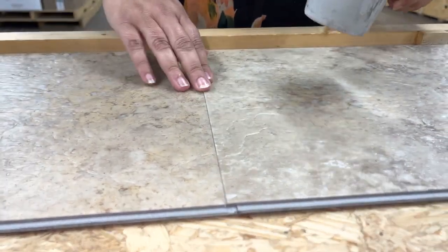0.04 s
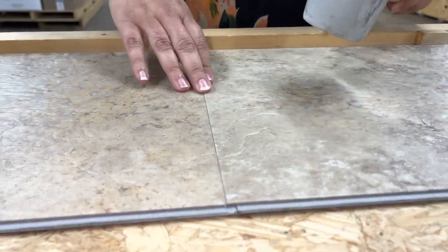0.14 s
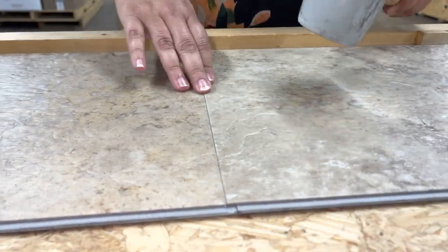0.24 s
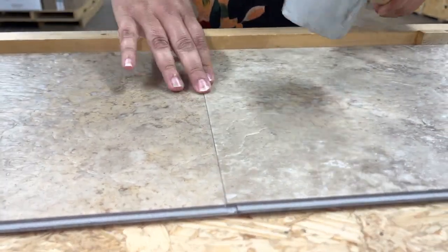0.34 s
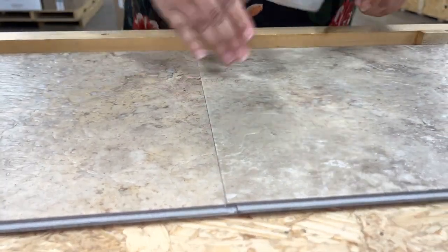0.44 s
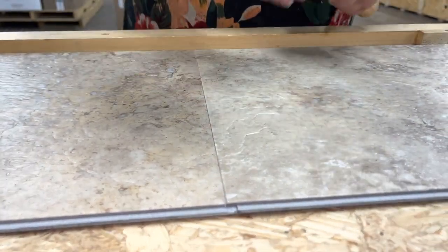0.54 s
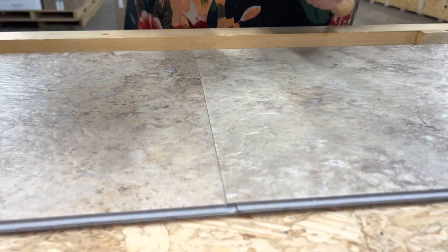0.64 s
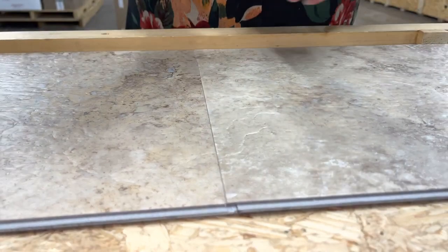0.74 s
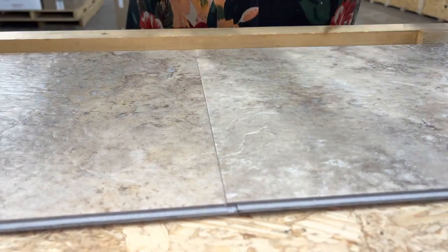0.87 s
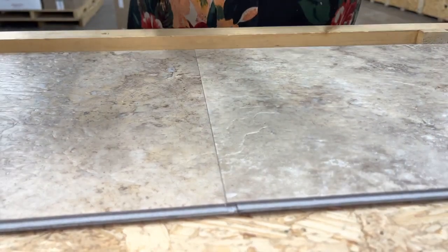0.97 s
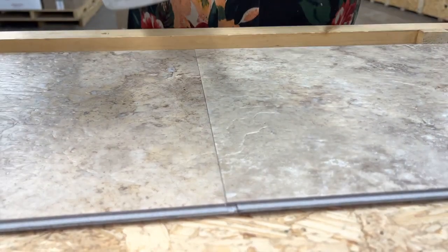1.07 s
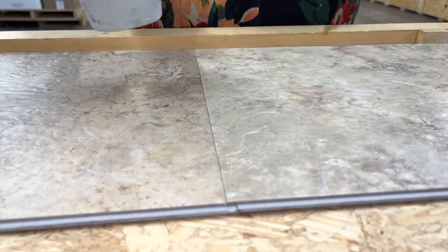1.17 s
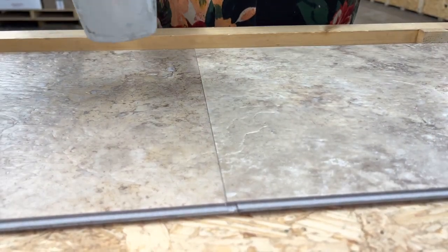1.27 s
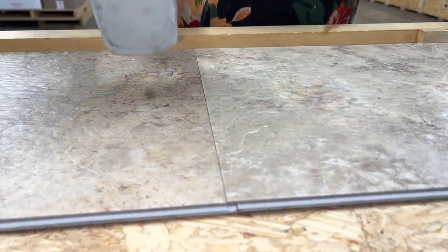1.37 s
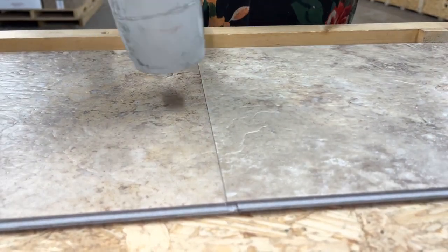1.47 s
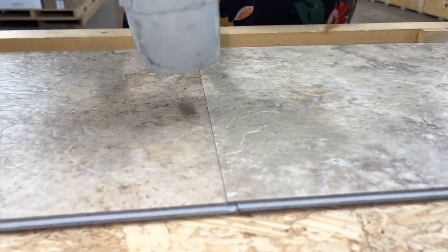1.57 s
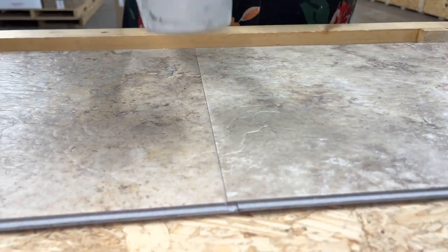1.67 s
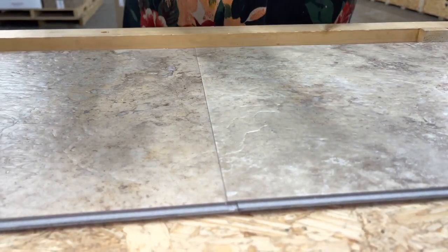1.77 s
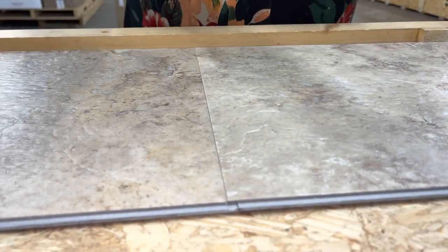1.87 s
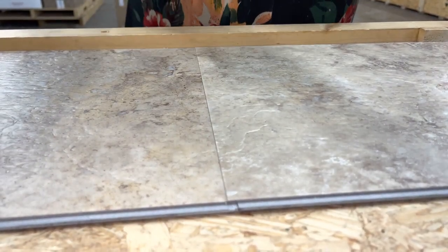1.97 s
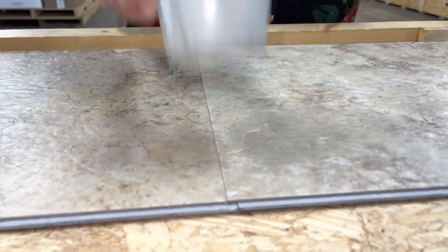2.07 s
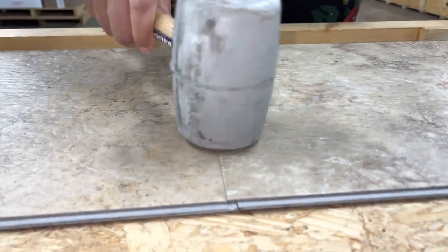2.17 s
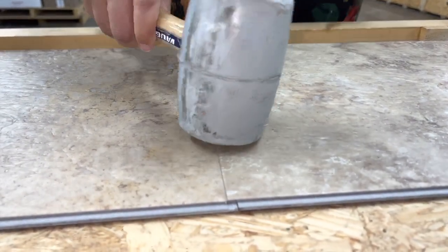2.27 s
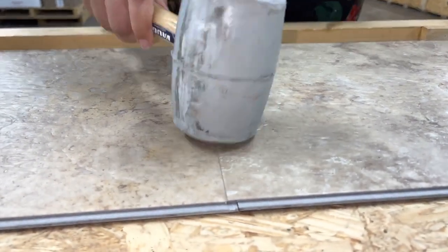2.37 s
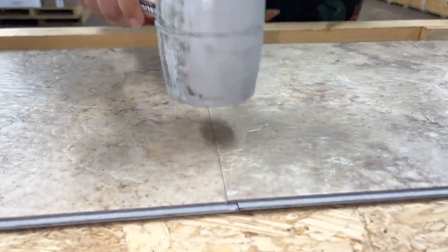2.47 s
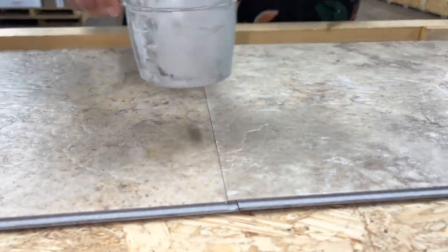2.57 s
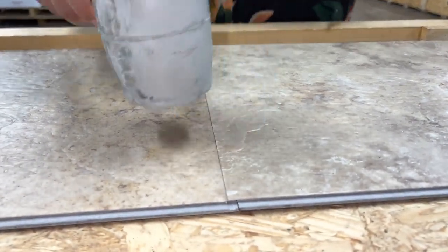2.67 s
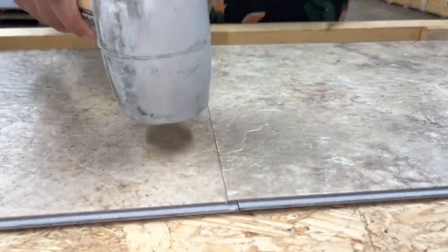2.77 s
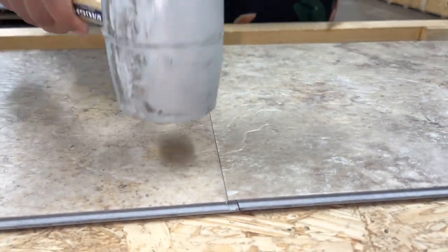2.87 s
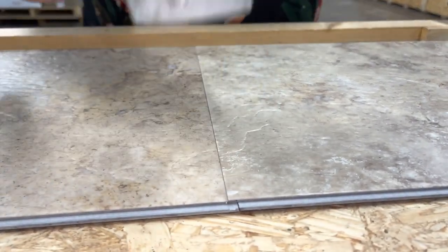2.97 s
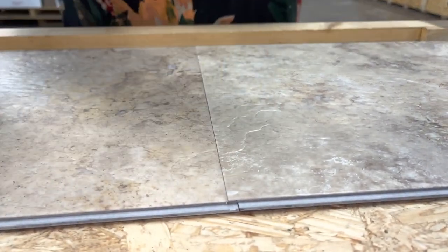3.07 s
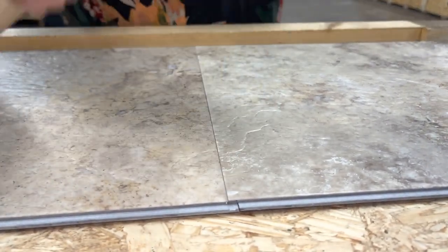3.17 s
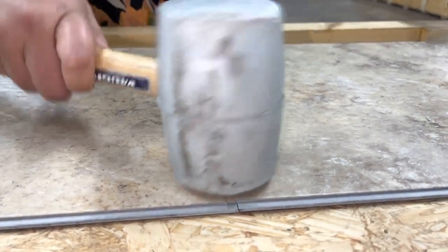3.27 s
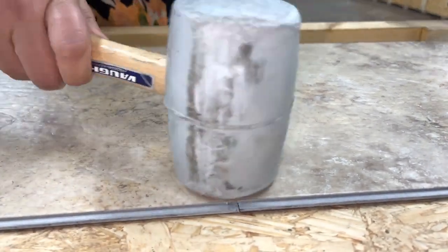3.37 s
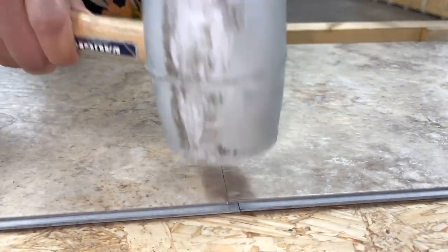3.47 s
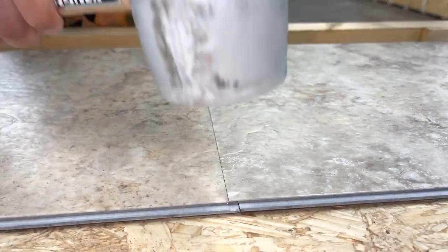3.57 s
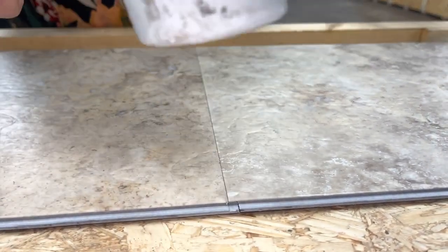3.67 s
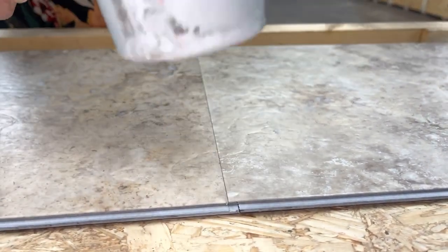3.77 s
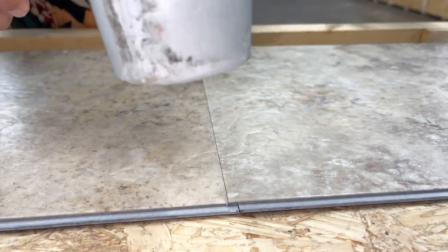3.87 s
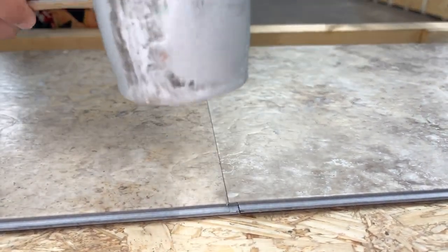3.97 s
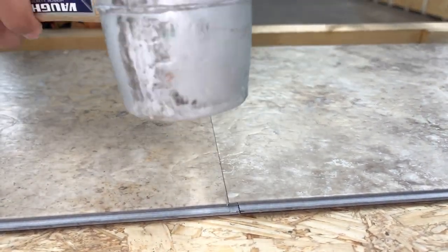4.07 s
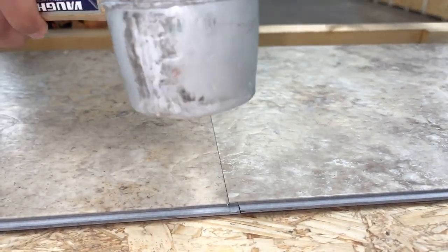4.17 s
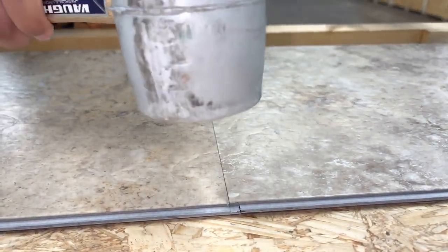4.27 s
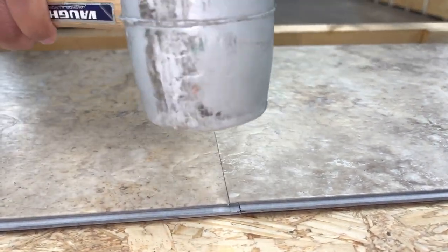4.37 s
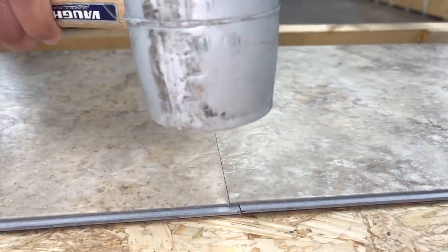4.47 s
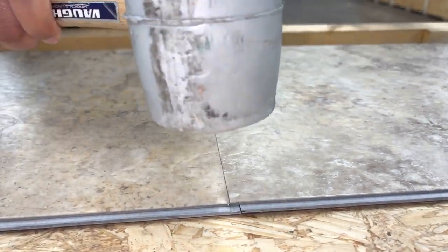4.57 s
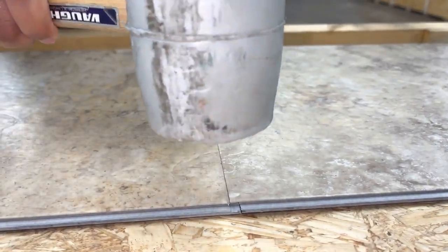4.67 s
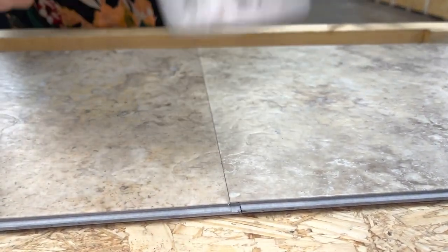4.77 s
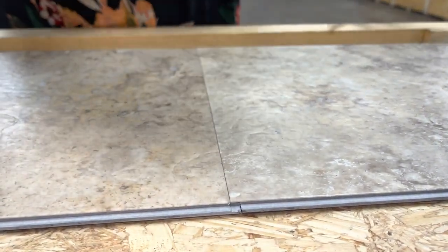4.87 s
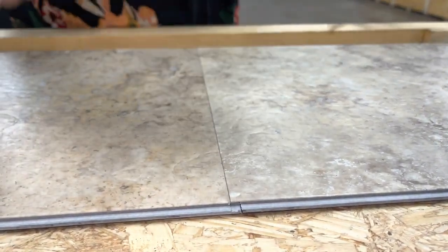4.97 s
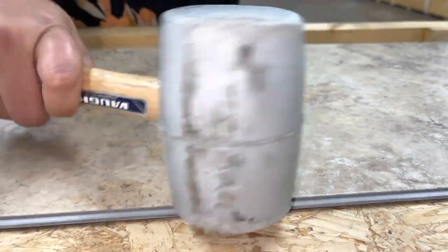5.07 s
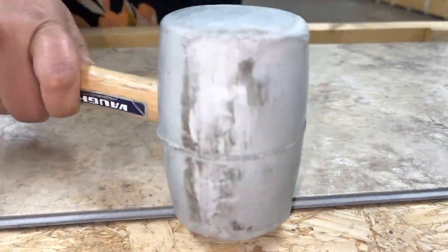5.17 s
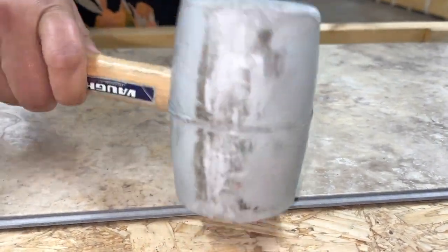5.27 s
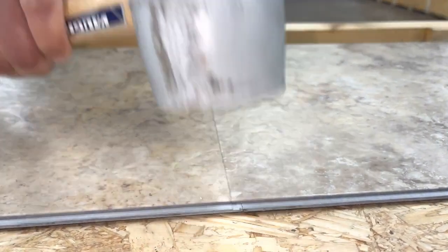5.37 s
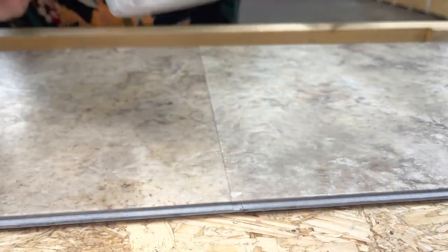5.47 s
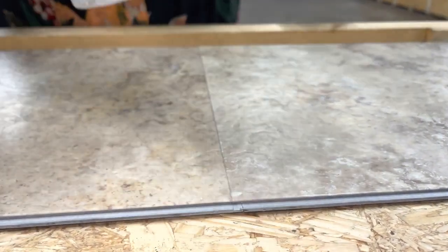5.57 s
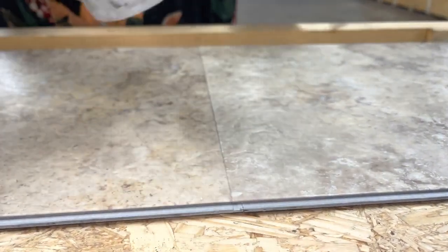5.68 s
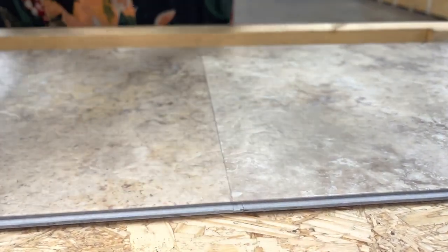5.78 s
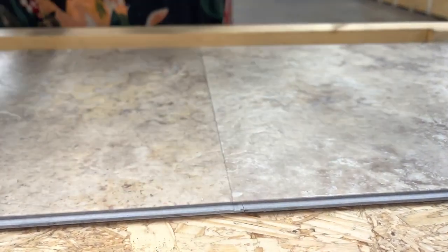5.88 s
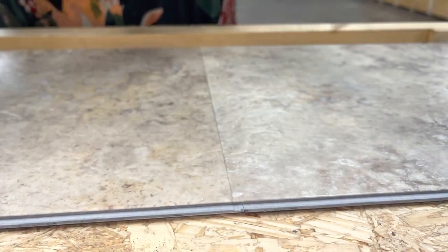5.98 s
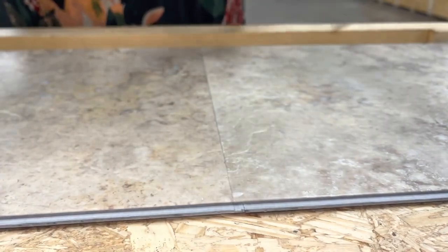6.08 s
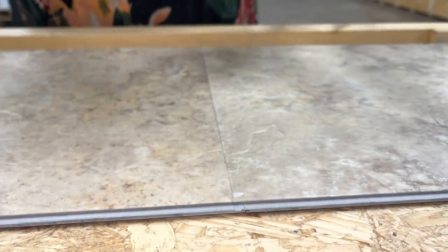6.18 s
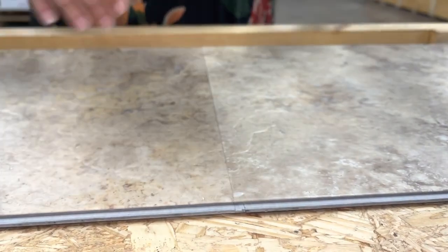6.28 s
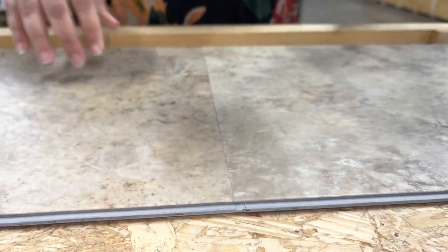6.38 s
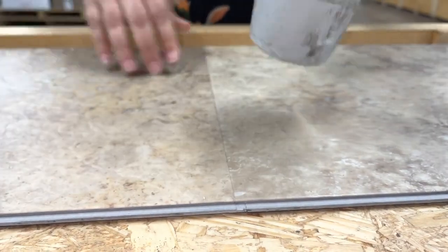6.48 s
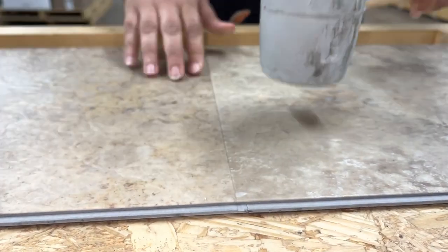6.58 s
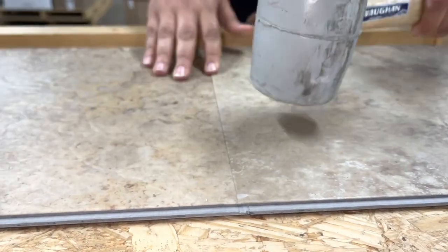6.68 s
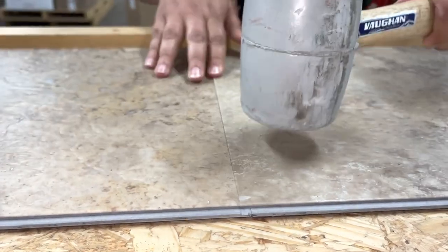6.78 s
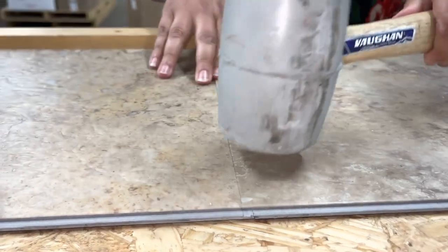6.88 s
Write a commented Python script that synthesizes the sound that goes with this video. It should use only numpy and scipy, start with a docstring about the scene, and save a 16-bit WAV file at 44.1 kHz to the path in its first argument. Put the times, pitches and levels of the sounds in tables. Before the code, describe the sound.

Close to a chipboard bench in a large indoor showroom, fans hum low while a sleeve rustles and small things tick. A rubber mallet then strikes a floor tile three times, about a second and then nearly two seconds apart, each a hard crack with a deep thud, woody rattle and hall tail. The background ducks at the knocks and stays quieter after the second.

```python
"""A large showroom, heard close to a chipboard bench: a rubber mallet knocks three times on a floor tile laid on it.
A noise burst swells just before each blow, which is a crack and a falling sine thud, ringing sines and rattling noise.
Noise bands and long sines make the hall's tail and the bench frame; fans are wavering noise, hum, drone and whine.
A sleeve rustles in strokes of treble noise and small things tick. The level of hall and fans dips at every knock,
swells back and settles, staying low after the second."""
import sys
import numpy as np
from scipy import signal
from scipy.fft import rfft, irfft
from scipy.io import wavfile
from scipy.ndimage import uniform_filter1d

SR = 44100
rng = np.random.default_rng(int(sys.argv[2]) if len(sys.argv) > 2 else 0)


def digitize_waveform(pressure):
    """Quantize a signal to 16-bit integers and store it at the path in sys.argv[1].

    Rows of a 2-D input are taken as channels; values are limited to [-1, 1].
    """
    field = np.atleast_2d(pressure).T
    bounded = np.clip(field, -1, 1)
    quanta = np.round(bounded * 32767).astype(np.int16)
    wavfile.write(sys.argv[1], SR, quanta)


N = 305613

# Colours below list relative levels: noise() brings each colour to rms 1 before its own level is set.

# Level of far sound, shared by hall and fans
START_DB, FALL_S, DIP_S = -0.07, .015, 0.074  # first level, fall before the blow, lowest point after it
CLIMB_AFTER_S, CLIMB_DB_PER_S = 1.2, 6.5  # a long while after a knock it creeps up again
LEFT_LAG = 18  # samples by which far sound reaches the left side late

# Fans
# colour of moving air: (frequency [Hz], relative density [dB per Hz])
AIR_COLOUR = [(20, -9.5), (35, -11.5), (70, -0.5), (120, -4.5), (250, -17.5), (500, -25), (800, -32),
              (1150, -32.5), (1500, -31), (1900, -37), (2250, -39.5), (2800, -43), (5000, -53), (6300, -50),
              (7100, -59), (9000, -59), (13000, -64.5)]
AIR_DB = -45.5
MURMUR_HZ, MURMUR_DB = 1600, 1.5  # the air wavers most around here
# likeness of left and right noise: (frequency [Hz], likeness [-1 to 1])
ALIKE = [(60, 0.95), (200, .92), (400, .7), (700, .4), (1400, 0.15), (3000, .08)]
MAINS_HZ, DRONE_HZ = 59.2, 134.6
MAINS_DB = -45
# a motor drone that wavers, sinks and partly returns: (time [s], level [dB])
DRONE_LEVEL = [(0, -45), (.4, -38.5), (.62, -38.5), (.68, -46), (.75, -39), (2.1, -37), (2.6, -40.5),
               (2.9, -54), (3.1, -42), (4, -46.5), (6.93, -46.5)]
# whine, lowest line first: (level [dB]) for each of six evenly spaced lines
WHINE_LEVELS = (-90, -79.5, -81.5, -78, -76.5, -85.5)
WHINE_HZ, WHINE_STEP_HZ = 3796.3, 79.65  # lowest line and spacing
WHINE_HISS_DB = -81

# Sleeve and ticks
# strokes of sleeve and hand: (time [s], hold [s], level [dB], rise over 20 dB [s], fall over 20 dB [s],
# brightness [dB per octave])
RUSTLE_STROKES = [(.004, .02, -87, .01, .25, 1.3), (0.322, .004, -67, 0.022, 0.048, 2),
                  (0.372, .046, -57.5, .012, 0.021, 3.5), (0.558, .004, -71, 0.22, 0.086, 19),
                  (0.655, .004, -64.5, 0.16, .09, -1), (.694, .004, -63, 0.022, 0.1, 3),
                  (0.795, 0.022, -65.5, 0.033, 0.11, 1), (1.111, 0.057, -68, .04, .1, -9),
                  (1.235, .01, -62.5, 0.081, .065, 0), (1.317, .004, -62.5, 0.029, .016, -2),
                  (1.617, 0.0046, -76, 0.028, 0.036, 1.3), (2.04, .03, -76.5, .2, .03, 0.55),
                  (2.571, .02, -65, 0.068, 0.079, -7.5), (2.657, 0.0037, -65.5, 0.015, 0.03, 0.5),
                  (5.981, .05, -87, .05, .1, 2.5), (6.309, 0.039, -84.5, .04, .03, 3.5),
                  (6.66, 0.2, -78, .17, .16, -2.5)]
# colour of rubbing cloth, also of the spit in a tick: (frequency [Hz], relative density [dB per Hz])
CLOTH_COLOUR = [(800, -22), (2000, 8.5), (3500, 3), (6000, 5.5), (9000, 4.5), (11500, 9), (13000, -39.5)]
# small taps: (time [s], body level [dB], body pitch [Hz], treble level [dB], left minus right [dB])
TICKS = [(.049, -56.5, 655, -65, 5.5), (0.314, -62, 1540, -60, 4), (.325, -56.5, 960, -68, 5),
         (.651, -54.5, 630, -57, 11), (1.914, -66, 1460, -55.5, 4), (2.649, -81, 1490, -58, 3),
         (5.869, -83, 1660, -94, -4), (5.949, -76, 670, -82, 2), (6.03, -85, 3650, -67.5, 4),
         (6.342, -73, 970, -67, 3), (6.448, -74, 955, -65, 4), (6.466, -72.5, 1130, -70, -4),
         (6.479, -78, 890, -76, 6), (6.758, -76, 568, -83, 8), (6.771, -72, 520, -68, 11)]
TICK_ROUGH_T60_S, TICK_RING_T60_S, TICK_SPIT_T60_S = 0.036, 0.033, 0.013
TICK_RING_DB = 5.5  # against the body level

# The three knocks, one entry a knock under each name. Times in [s], frequencies in [Hz], levels in [dB]:
# s (time of the thud); run_up_s, run_up_bend (burst before it: length; under 1 swells early, over 1 late),
# left_db, right_db, top_hz, treble_db (rough levels, upper corner and sizzle of that burst);
# wave_db, wave_s (thud level and length); crack_db, crack_tilt_db (tilt [dB per octave]);
# lift_hz, lift_db (a lift or cut high in the crack), snap_db (and one around SNAP_HZ);
# bounce_s, bounce_db (a faint second tick); ring_db (bench and clatter together),
# clatter_rise_s, clatter_db (against ring_db), clatter_tilt_db ([dB per octave]), drop_db (later step);
# hall_db, hall_tilt_db ([dB per octave] above 1 kHz); far sound: blow_db (at the thud), dip_db,
# swell_s, swell_db (when and how high it swells back), rest_db, settle_s (where it rests, how soon)
KNOCKS = dict( s=(2.0989, 3.233, 5.0365), run_up_s=(.0135, .015, .024), run_up_bend=(.8, 0.83, 1.5),
          wave_db=(-0.5, -9.5, -5), wave_s=(.014, .016, .019), crack_db=(-9, -10, -18),
          crack_tilt_db=(2.5, 1.13, -8.5), lift_hz=(13800, 11300, 11420), lift_db=(13.5, -4, 16.5),
          snap_db=(7.5, 2, -2), bounce_s=(.026, .025, .032), bounce_db=(-42.5, -50, -36.5),
          ring_db=(-16, -27, -18.5), clatter_rise_s=(.011, .004, .005), clatter_db=(1.34, 2.5, 2),
          clatter_tilt_db=(-0.4, 0.8, .7), drop_db=(-3, -2.5, 0), left_db=(-16.5, -13, -24.5),
          right_db=(-7, -6, -18), top_hz=(2200, 1600, 1150), treble_db=(-26.5, -16, -43),
          hall_db=(-20.5, -16.5, -15.5), hall_tilt_db=(-0.3, 1.43, -2), blow_db=(-9, -28.5, -12),
          dip_db=(-15.5, -29, -20), swell_s=(.35, 0.2702, .24), swell_db=(4.5, -16, -10.5),
          rest_db=(-3, -25, -24), settle_s=(0.09, 0.115, 0.19))
EACH_KNOCK = [dict(zip(KNOCKS, row)) for row in zip(*KNOCKS.values())]
BLOW_SIZE, BLOW_LEAD_S = 32768, .05  # samples worked out around one blow; they begin this long before it
BLOW_T = np.arange(BLOW_SIZE) / SR - BLOW_LEAD_S
BLOW_BINS_HZ = np.fft.rfftfreq(BLOW_SIZE, 1 / SR)

# Run-up: the burst before each blow
# resonances: (frequency [Hz], width [Hz], lift [dB])
RUN_UP_PEAKS = [(320, 60, 9), (654, 30, 11), (980, 270, 5), (1220, 90, 4), (1740, 240, 5.5), (2750, 180, 8)]
# colour of its treble: (frequency [Hz], relative density [dB per Hz])
SIZZLE_COLOUR = [(2000, -19), (3000, -5), (4400, -5.5), (5200, -7.5), (6000, -2.5), (7600, -9.5),
                 (8800, -11), (11000, -28.5), (13000, -60.5)]
SIZZLE_BEND = 1.4  # the treble swells late
LEFT_TILT_DB = -3  # an octave: the rough part is duller on the left

# Thud, crack and first echo
WAVE_TURNS, WAVE_START_S, WAVE_END_HZ, WAVE_PHASE = 1.25, .001, 50, .39  # phase in turns
# colour of the crack: (frequency [Hz], relative density [dB per Hz])
CRACK_COLOUR = [(1000, -24), (2500, -3.5), (5500, -4.5), (8500, -5.5), (10000, -12), (11500, -12.5),
                (13000, -27.5), (14500, -46.5), (16500, -59.5)]
SNAP_HZ = 5400
ECHO_S, ECHO_DB = .0115, -17.5

# Bench, clatter and frame
# modes of the board: (frequency [Hz], relative level [dB], t60 [s])
BENCH_MODES = [(36.72, -5, 0.34), (157, -2.5, 0.21), (368, -7.5, 0.076), (527, -5.5, 0.13),
               (661, -12, 0.13), (1061, -6.5, 0.056), (1243, -18, 0.11), (1428, -16, 0.1),
               (1765, -14, 0.14), (2060, -20.5, 0.067), (2850, -30.5, .2)]
RING_RISE_S = .011
# colour of the rattle: (frequency [Hz], relative density [dB per Hz])
CLATTER_COLOUR = [(60, -11.5), (150, 1.5), (400, -6), (1000, -15.5), (1700, -19.5), (3000, -37),
                  (6000, -47.5), (11000, -49), (13500, -87.5)]
# likeness of left and right rattle: (frequency [Hz], likeness [-1 to 1])
CLATTER_ALIKE = [(200, .82), (700, .02), (1400, 0.077)]
CLATTER_T60_S = 0.26
DROP_S = .061  # bench and clatter start to step down this long after the blow
# long modes of the bench frame: (frequency [Hz], relative level [dB], t60 [s])
FRAME_MODES = [(91.7, -13.5, 7.5), (102, -14, 16), (165, -9.5, 1.8)]
FRAME_DB = -9.5  # against the hall
BEAT_HZ, BEAT_LAG_S = (198.3, 201.4), .065  # close modes throb about three times a second
BEAT_DB, BEAT_T60_S = -9.5, 2.93

# Hall
# colour of the tail: (frequency [Hz], relative density [dB per Hz])
HALL_COLOUR = [(35, -38.5), (60, -17.5), (95, -8), (200, -6), (250, -19.5), (600, -23), (850, -28),
               (1200, -24), (1700, -22.5), (2300, -30.5), (3200, -38), (5000, -42.5), (6500, -39.5),
               (9000, -44), (11500, -52.5), (13500, -78.5)]
# decay of the tail: (frequency [Hz], t60 [s])
HALL_T60 = [(100, 1.2), (300, 1.4), (1000, .75), (2000, .9), (4000, 1.1), (10000, 0.66)]
HALL_RISE_S = 0.013  # the tail builds up

# Final colour
# tone of the whole mix: (frequency [Hz], gain [dB])
FINAL_COLOUR = [(15, -20.5), (28, -7), (45, 0.5), (9000, 0), (10100, -8), (11300, 2.5), (13000, -3.5)]
HISS_DB, TOP_HZ = -102, 16400


def undb(db):
    """Decibels to gain."""
    return 10 ** (np.asarray(db) / 20)


def read(table, x):
    """Second column of a table at x, on a log axis."""
    return np.interp(np.log(x + 1), np.log(np.array(table)[:, 0] + 1.), np.array(table)[:, 1])


def curve(table):
    """A (time [s], level [dB]) table as a gain for every sample."""
    return undb(np.interp(np.arange(N) / SR, *np.transpose(table)))


def noise(colour, size=N, alike=ALIKE):
    """Spectra of left and right noise of a given colour and likeness, rms 1."""
    hz = np.fft.rfftfreq(size, 1 / SR)
    mid, side = rfft(rng.standard_normal((2, size))) * undb(read(colour, hz))
    likeness = np.clip(read(alike, hz), -1, 1)
    pair = np.sqrt(1 + likeness) * mid + np.sqrt(1 - likeness) * side * np.array([[1], [-1]])
    return pair / np.std(irfft(pair, size))


def tilt(colour, tilt_db):
    """A colour made brighter or duller, turning about 4 kHz."""
    return [(hz, db + tilt_db * np.log2(hz / 2 ** 12)) for hz, db in colour]


def octaves(pair):
    """Splits noise into overlapping octave bands that add up to the whole from 16 Hz to 16 kHz."""
    at = np.log2(np.fft.rfftfreq(N, 1 / SR) + 1)
    for centre in range(4, 15):
        weight = np.cos(np.pi / 2 * np.clip(at - centre, -1, 1)) ** 2
        yield 2. ** centre, irfft(pair * weight, N)


def walk(rate):
    """Random levels held 1 / rate s and slewed twice."""
    hold = int(SR / rate)
    steps = np.repeat(rng.standard_normal(N // hold + 1), hold)
    return uniform_filter1d(uniform_filter1d(steps, hold), hold)[:N]


def fade(t, t60):
    """Silence before t = 0, then 60 dB down in t60."""
    return (t >= 0) * np.exp(-np.log(1000) * np.abs(t) / t60)


def ring(t, modes, scatter_db):
    """Modes of a struck body as dying sines; every blow shares its force out anew."""
    return sum(undb(db + scatter_db * rng.standard_normal()) * fade(t, t60) * np.sin(2 * np.pi * hz * t)
               for hz, db, t60 in modes)


def add(out, x, s):
    """Mixes x into out from time s on."""
    i = int(round(s * SR))
    out[:, i:i + x.shape[-1]] += x[..., :N - i]


def far_level():
    """Gain of far sound: at each knock it falls, dips, swells back, settles and, if left alone, creeps up."""
    db = np.full(N, START_DB)
    for k in EACH_KNOCK:
        t = np.arange(N) / SR - k["s"]
        before = db[np.searchsorted(t, -FALL_S)]
        dip = np.interp(t, [-FALL_S, 0, DIP_S, k["swell_s"]],
                        [before, k["blow_db"], k["dip_db"], k["swell_db"]])
        settled = 1 - np.exp(-np.clip(t - k["swell_s"], 0, None) / k["settle_s"])
        settle = (k["rest_db"] - k["swell_db"]) * settled
        climb = CLIMB_DB_PER_S * np.clip(t - CLIMB_AFTER_S, 0, None)
        db = np.where(t < -FALL_S, db, dip + settle + climb)
    return undb(db)


def fans():
    """Moving air in bands that swell together and flicker alone, mains hum, a motor drone and a thin whine."""
    t, swell = np.arange(N) / SR, walk(0.56)
    air = 0
    for hz, band in octaves(noise(AIR_COLOUR)):
        flicker_db = 1.26 + MURMUR_DB / (1 + np.log2(hz / MURMUR_HZ) ** 2)
        air = air + band * undb(swell + flicker_db * walk(6.3))
    # slow random phase keeps each tone from standing still
    mains = undb(MAINS_DB + 0.47 * walk(5.4)) * np.sin(2 * np.pi * MAINS_HZ * t + .5 * walk(2.4))
    drone = curve(DRONE_LEVEL) * undb(1.2 * walk(2.8)) * np.sin(2 * np.pi * DRONE_HZ * t + .4 * walk(12))
    whine = 0
    for line, db in enumerate(WHINE_LEVELS):
        hz = WHINE_HZ + line * WHINE_STEP_HZ
        whine = whine + undb(db + 1.1 * walk(10)) * np.sin(2 * np.pi * hz * t + walk(18))
    # a narrow hiss around the whine
    hiss = irfft(noise([(3500, -38), (3850, -3), (4100, 1.5), (4300, -2.5), (4700, -43.5)]), N)
    return (undb(AIR_DB) * air * undb([[.8], [-.8]])
            + mains * undb([[1.2], [-1.2]])
            + drone * undb([[2.5], [-3.0]])
            + whine * undb([[1.5], [-1.5]])
            + undb(WHINE_HISS_DB) * hiss)


def rustle():
    """Cloth rubbing: strokes of grainy treble noise that rise, hold and fall."""
    out, size = np.zeros((2, N)), 32768
    for s, hold_s, db, rise_s, fall_s, tilt_db in RUSTLE_STROKES:
        lead = min(s, .3)  # room for the rise
        t = np.arange(size) / SR - lead
        shape_db = db - 20 * np.maximum(np.maximum(-t / rise_s, (t - hold_s) / fall_s), 0)
        cloth = irfft(noise(tilt(CLOTH_COLOUR, tilt_db), size), size)
        add(out, undb(shape_db) * cloth, s - lead)
    return out * undb(1.5 * walk(160))


def ticks():
    """Small taps: a short ring with a rough edge and a spit of treble."""
    out, size = np.zeros((2, N)), 2048
    t = np.arange(size) / SR
    for s, body_db, hz, treble_db, pan_db in TICKS:
        peak = [(hz / 1.5, -25), (hz / 1.1, -3), (hz * 1.1, -3), (hz * 1.4, -14), (hz * 2.5, -22), (hz * 5, -50)]
        edge = irfft(noise(peak, size, alike=[(1, .8), (2, 0.67)]), size)
        rough = undb(body_db) * edge * fade(t, TICK_ROUGH_T60_S)
        tone = undb(body_db + TICK_RING_DB) * np.sin(2 * np.pi * hz * t) * fade(t, TICK_RING_T60_S)
        spit = undb(treble_db) * irfft(noise(CLOTH_COLOUR, size), size) * fade(t, TICK_SPIT_T60_S)
        attack = np.clip(t / 0.00063, 0, 1)
        add(out, attack * (rough + tone + spit) * undb([[pan_db / 2], [-pan_db / 2]]), s)
    return out


def run_up(k):
    """A rough, resonant burst with sizzling treble swells just ahead of the thud and stops as the thud begins."""
    swell = np.clip(1 + BLOW_T / k["run_up_s"], 0, 1) * (BLOW_T < 0)
    peaks_db = sum(db / (1 + ((BLOW_BINS_HZ - hz) / width) ** 2) for hz, width, db in RUN_UP_PEAKS)
    duller = undb(np.array([[LEFT_TILT_DB], [0]]) * np.log2((BLOW_BINS_HZ + 1) / 2 ** 10))
    top_hz = k["top_hz"]
    colour = [(150, -14), (330, -.8), (700, 0), (top_hz, -4), (1.4 * top_hz, -20), (3 * top_hz, -45)]
    spectrum = noise(colour, BLOW_SIZE, alike=[(1, -.5), (2, -.5)]) * undb(peaks_db - 5.0) * duller
    rough = irfft(spectrum, BLOW_SIZE) * undb([[k["left_db"]], [k["right_db"]]])
    sizzle = undb(k["treble_db"]) * irfft(noise(SIZZLE_COLOUR, BLOW_SIZE), BLOW_SIZE)
    return swell ** k["run_up_bend"] * rough + swell ** SIZZLE_BEND * sizzle


def bending_wave(k):
    """Bending waves disperse: the high pitches arrive first, so the sine thud glides down."""
    after = np.clip(BLOW_T, 0, None)
    turns = WAVE_TURNS * np.log(1 + after / WAVE_START_S) + WAVE_END_HZ * after + WAVE_PHASE
    turns = turns + np.array([[0], [.05]])  # the right side runs slightly ahead
    shape = np.clip(BLOW_T / 0.0019, 0, 1) * np.exp(-(after / k["wave_s"]) ** 3)
    return undb(k["wave_db"]) * shape * np.sin(2 * np.pi * turns) * undb([[0], [-2.5]])


def crack(k):
    """The hard contact: a few milliseconds of bright noise, then a faint second tick as it bounces."""
    lift_db = k["lift_db"] / (1 + ((BLOW_BINS_HZ - k["lift_hz"]) / 1600) ** 2)
    snap_db = k["snap_db"] / (1 + ((BLOW_BINS_HZ - SNAP_HZ) / 700) ** 2)
    spectrum = noise(tilt(CRACK_COLOUR, k["crack_tilt_db"]), BLOW_SIZE, alike=[(1, .2), (2, 0.096)])
    bright = irfft(spectrum * undb(lift_db + snap_db), BLOW_SIZE)
    first = undb(k["crack_db"]) * fade(np.abs(BLOW_T - .0006), 0.006)
    bounce = undb(k["bounce_db"]) * fade(np.abs(BLOW_T - k["bounce_s"]), .008)
    return bright * (first + bounce)


def bench(k):
    """The struck board rings in its own modes, building up over a moment."""
    return np.clip(BLOW_T / RING_RISE_S, 0, 1) ** 3 * ring(BLOW_T, BENCH_MODES, scatter_db=1.5)


def clatter(k):
    """Loose tile and board rattle unevenly: lumpy noise dying away."""
    lumps = undb(4.0 * walk(130)[:BLOW_SIZE])
    colour = tilt(CLATTER_COLOUR, k["clatter_tilt_db"])
    rattle = irfft(noise(colour, BLOW_SIZE, alike=CLATTER_ALIKE), BLOW_SIZE)
    rise = np.clip(BLOW_T / k["clatter_rise_s"], 0, 1) ** 3
    return rise * undb(k["clatter_db"]) * lumps * fade(BLOW_T, CLATTER_T60_S) * rattle


def blows():
    """Each near blow and the burst before it, with one early echo of thud and crack, sides swapped."""
    out = np.zeros((2, N))
    for k in EACH_KNOCK:
        start_s = k["s"] - BLOW_LEAD_S
        thud, snap = bending_wave(k), crack(k)
        step = undb(k["drop_db"] * np.clip((BLOW_T - DROP_S) / 0.0047, 0, 1))
        body = undb(k["ring_db"]) * step * (bench(k) + clatter(k))
        add(out, run_up(k) + thud + snap + body, start_s)
        add(out, undb(ECHO_DB) * (thud + 0.061 * snap)[::-1], start_s + ECHO_S)
    return out


def hall():
    """The hall's tail after each knock, each noise band with its own decay."""
    t, out = np.arange(N) / SR, 0
    for hz, band in octaves(noise(HALL_COLOUR)):
        octaves_up = max(np.log2(hz / 2 ** 10), 0)
        level = 0
        for k in EACH_KNOCK:
            after = t - k["s"]
            rise = np.clip(after / HALL_RISE_S, 0, 1) ** 2
            gain = undb(k["hall_db"] + k["hall_tilt_db"] * octaves_up)
            level = level + gain * fade(after, read(HALL_T60, hz)) * rise
        out = out + band * level
    return out


def frame():
    """The long ring of the bench frame, with a late pair of close modes that beat together."""
    t, out = np.arange(N) / SR, 0
    pair = [(hz, BEAT_DB, BEAT_T60_S) for hz in BEAT_HZ]
    for k in EACH_KNOCK:
        after = t - k["s"]
        modes = ring(after, FRAME_MODES, scatter_db=5) + ring(after - BEAT_LAG_S, pair, scatter_db=1.5)
        out = out + undb(k["hall_db"] + FRAME_DB) * modes
    return out * undb([[1.5], [-1.5]])


def scene():
    """Far sound dips under the knocks; near sounds keep their own levels."""
    far = far_level() * (fans() + hall() + frame())
    far = np.array([np.roll(far[0], LEFT_LAG), far[1]])
    return far + rustle() + ticks() + blows()


def record(dry):
    """Peaks are rounded, a last colouring trims the bass, dips at 10 kHz and lifts 11 kHz; faint hiss, top cut."""
    soft = np.tanh(1.238 * dry) / 1.083
    coloured = irfft(rfft(soft) * undb(read(FINAL_COLOUR, np.fft.rfftfreq(N, 1 / SR))), N)
    hiss = undb(HISS_DB) * rng.standard_normal(dry.shape)
    top_cut = signal.ellip(10, .2, 80, TOP_HZ, fs=SR, output="sos")
    return signal.sosfilt(top_cut, coloured + hiss)


dry = scene()
out = record(dry)
digitize_waveform(out)
```